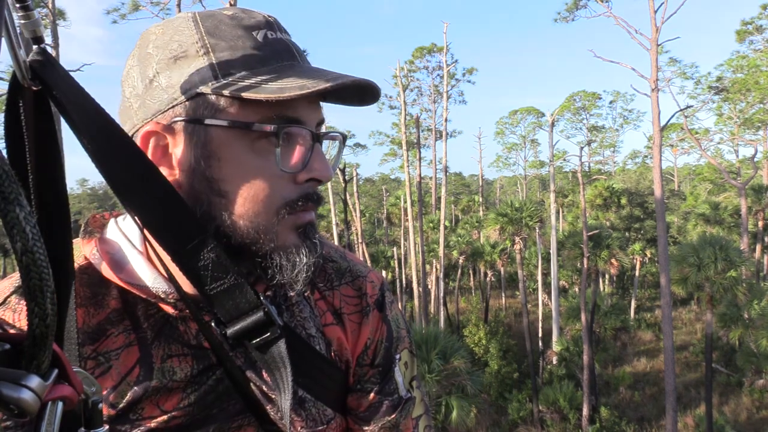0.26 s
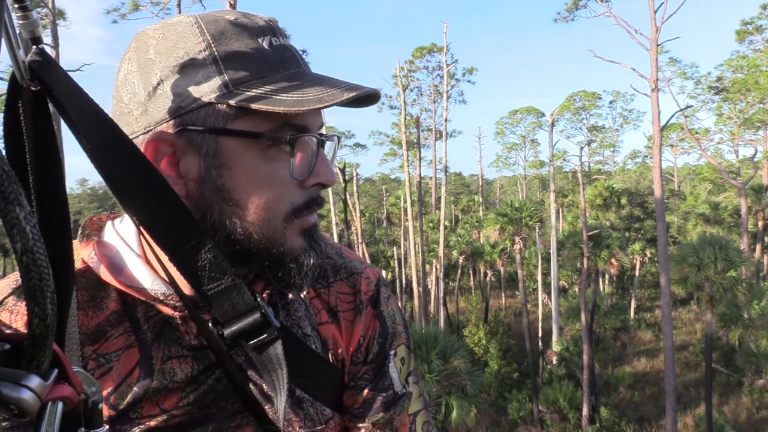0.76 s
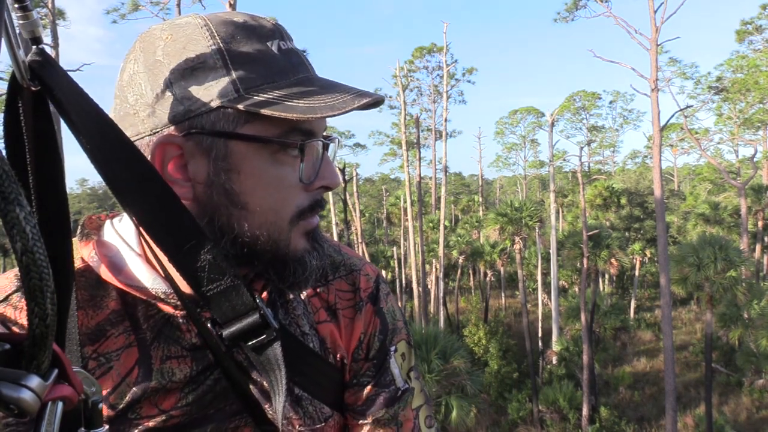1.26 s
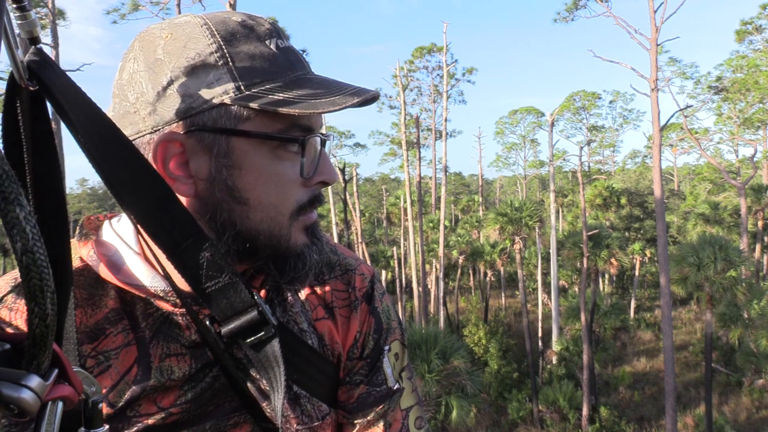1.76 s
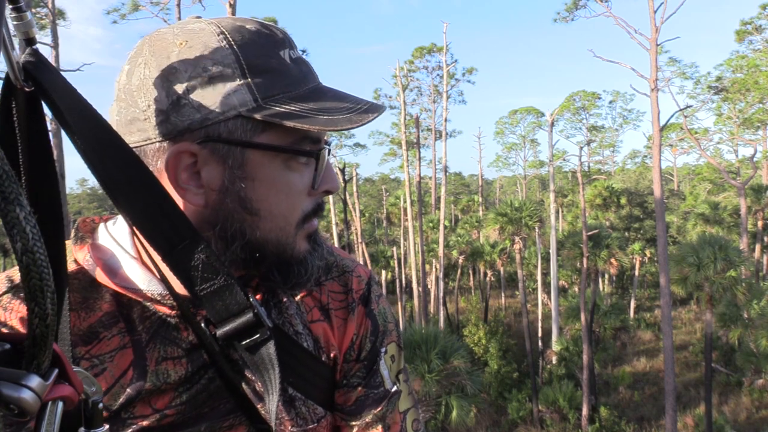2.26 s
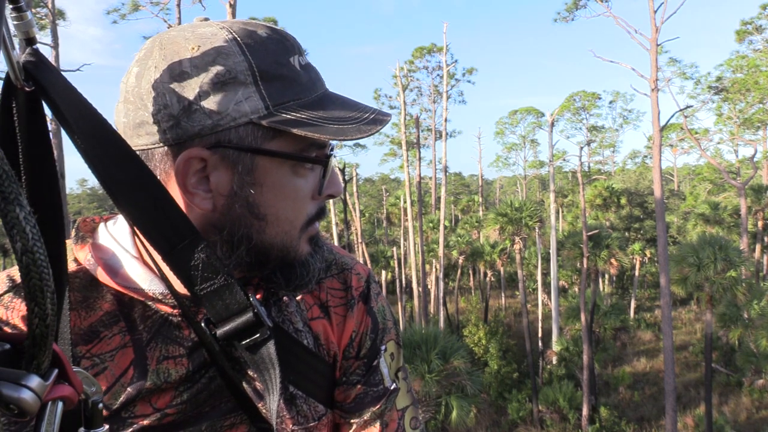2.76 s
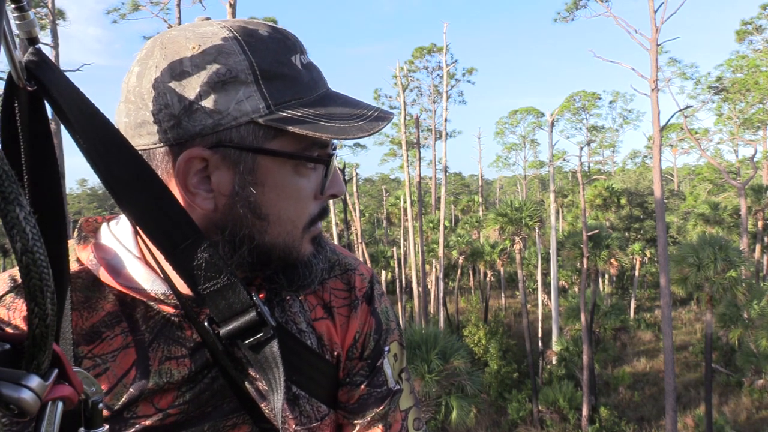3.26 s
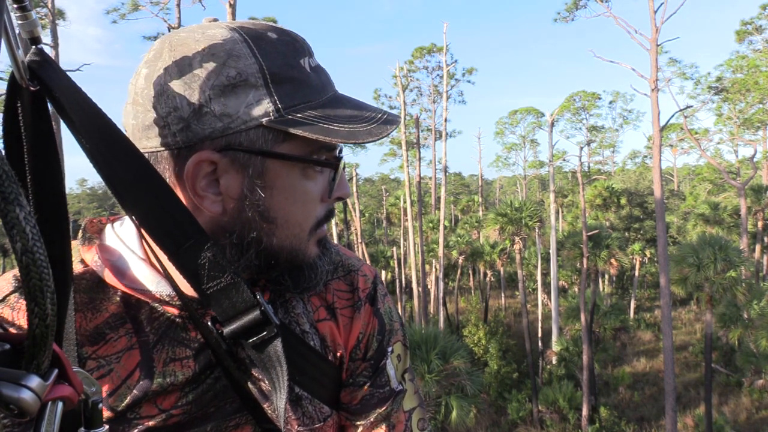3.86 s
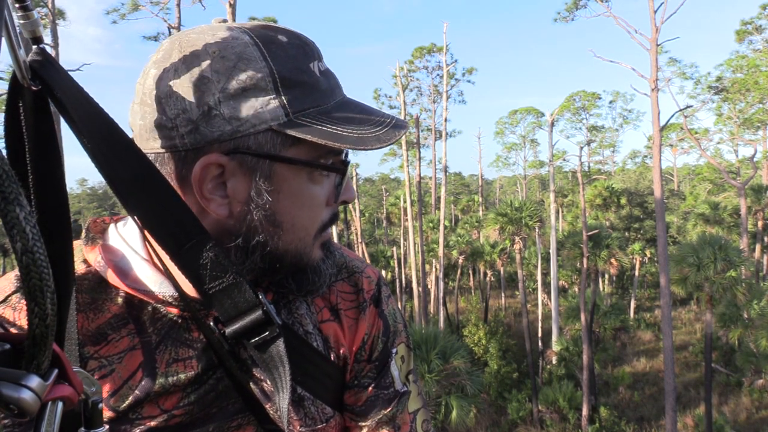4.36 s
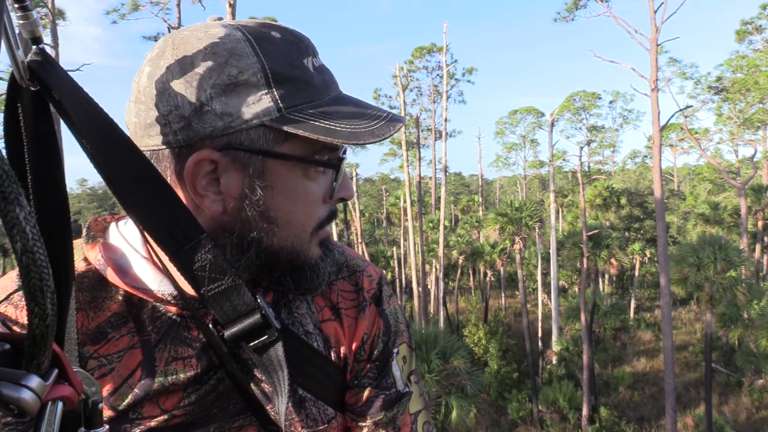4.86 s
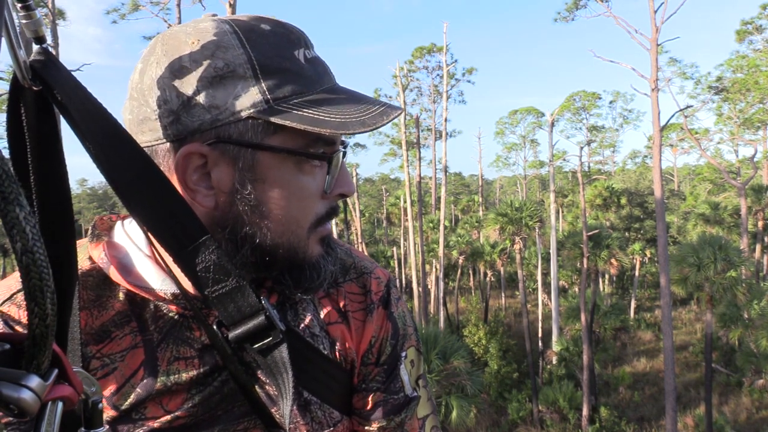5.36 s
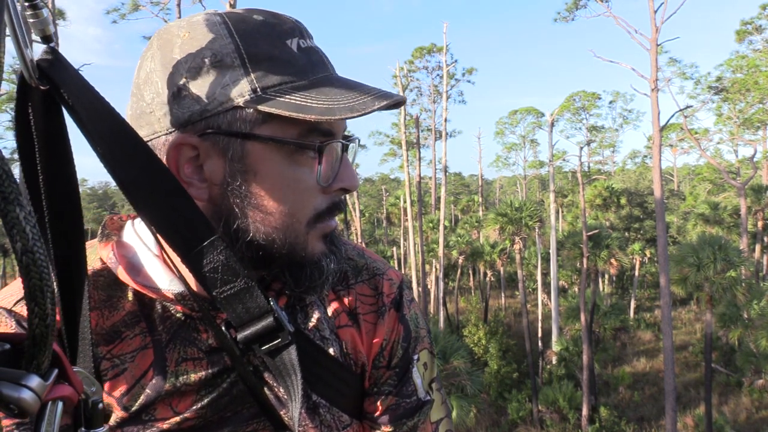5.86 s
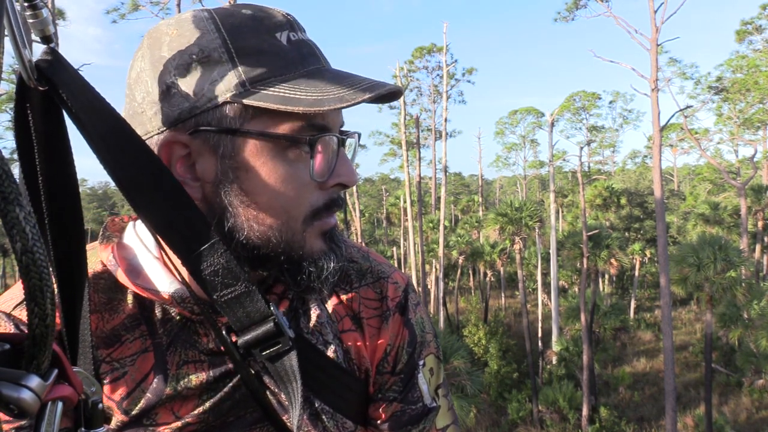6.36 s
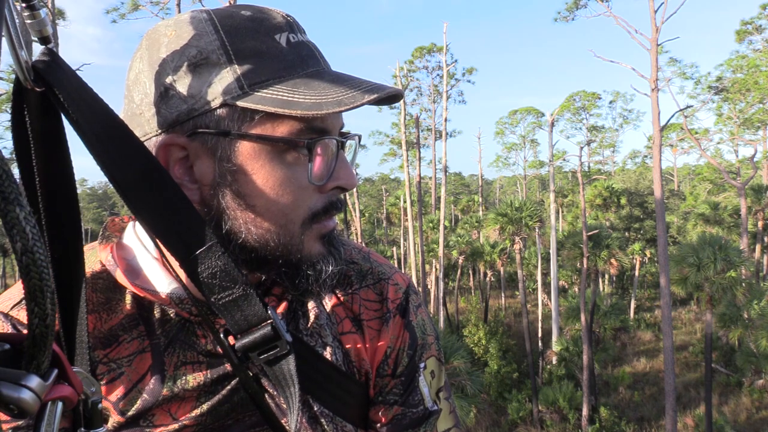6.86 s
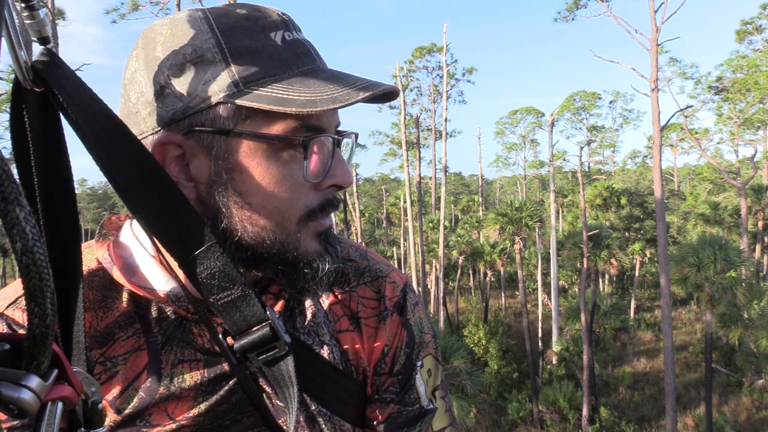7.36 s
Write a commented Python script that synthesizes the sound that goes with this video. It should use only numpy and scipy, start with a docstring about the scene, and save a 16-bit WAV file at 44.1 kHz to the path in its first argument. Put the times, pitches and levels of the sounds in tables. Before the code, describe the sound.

In quiet pine woods a hunter rattles two antlers close to the microphone. Light touches lead to a very loud, slightly overloaded crash, then uneven clacks and gritty grinding for about two seconds. Three shorter bursts follow, separated by pauses where faint insect hiss, a low murmur of air and a few tiny distant bird chips remain. Knocks are dry and bony, with a thin woodland tail.

```python
"""Pine woods throughout: filtered-noise insects and a low distant murmur of air, clearly stronger on the right.
From 0 s two nearby antlers touch lightly (decaying bone modes, short crack), clash at 0.54 s, then clack and
grind (dense tiny slips) to 2.9 s; knocks rebound faintly and the woods return a thin noise-built tail.
Bursts follow at 3.7-4.7, 5.4-6.1 and 7.3-7.6 s; noise chips of a far bird come at 3.0-3.4, 4.1 and 6.8-7.2 s.
The hardest knocks overload the microphone stage."""
import sys
import numpy as np
from scipy import signal
from scipy.fft import rfft, irfft
from scipy.io import wavfile

SR = 44100
rng = np.random.default_rng(int(sys.argv[2]) if len(sys.argv) > 2 else 0)


def wav_out(sig):
    """Save sig, one row per channel (or a flat mono array), as 16-bit PCM at SR to the path in sys.argv[1]."""
    wavfile.write(sys.argv[1], SR, np.round(np.clip(np.atleast_2d(sig).T, -1, 1) * 32767).astype(np.int16))


N = 335601

# air murmur spectrum, relative: freq_hz, density_db
AIR_SPECTRUM = [(20, -1.5), (45, -7.5), (90, -3), (145, 1.5), (220, -6.5), (400, -12.5), (620, -16),
                (735, -8.5), (850, -17), (1500, -24.5), (3000, -24.5), (8000, -32), (11500, -36),
                (13000, -45)]
# insect chorus spectrum, relative: freq_hz, density_db
INSECT_SPECTRUM = [(3500, -31.5), (4700, -23), (5400, -8), (5850, -10), (6300, -0.5), (6600, 1),
                   (6900, -6.5), (7200, -12.5), (7500, -28), (9000, -46)]
# left-right likeness of the background: freq_hz, correlation (unitless)
LIKENESS = [(130, 0.0095), (290, 0.51), (640, 0), (1400, 0), (7000, 0)]
# background balance: freq_hz, left_minus_right_db
SIDE_BALANCE = [(60, -4), (110, -8.5), (200, -14.5), (380, -10), (700, -11), (1290, -12.5), (2380, -6),
                (4400, 0), (8120, -3), (15000, -7)]
# antler knocks: start_s, level_db, favoured_hz (ring favoured by the strike point), edge_db (hard edge, relative)
KNOCKS = [(.0128, -53.5, 1366, -16.5), (0.142, -53.5, 820, -16), (0.1657, -48.5, 2940, -14.5),
          (0.3284, -36.5, 1700, -14.5), (0.4929, -41, 1580, -12), (0.5073, -32.5, 1880, -14.5),
          (.5368, -2.5, 3890, -3), (0.5422, -11, 3050, -12), (.5525, -24.5, 2930, -12.5),
          (0.5639, -5, 2980, -12), (.57, -9, 2965, 1.5), (.579, -16, 1575, -6), (.589, -15.5, 1440, -9),
          (0.6854, -29, 3430, -6.5), (.92, -66.5, 777, -20), (1.1591, -19, 3050, -4),
          (1.1722, -23.5, 2230, -12), (1.1829, -19.5, 2770, -10), (1.188, -25, 2840, -10.5),
          (1.2679, -21.5, 2070, -2), (1.2787, -28, 3730, -6), (1.286, -32.5, 1427, -2.5),
          (1.3608, -25.5, 3290, -8.5), (1.3763, -18, 1224, -17.5), (1.3813, -22, 1068, -3.5),
          (1.4072, -27.5, 1510, -15), (1.425, -22.5, 1604, -3), (1.4486, -43, 1630, -13),
          (1.5295, -51.5, 1040, -33), (1.6461, -22.5, 3560, -9), (1.8353, -25, 2800, -10.5),
          (1.8615, -27.5, 1570, -14.5), (1.8869, -36.5, 2520, -7.5), (1.9872, -13.5, 3160, -20),
          (2.0013, -26, 1440, -6), (2.0056, -11.5, 1594, -9), (2.0171, -23, 1416, -19),
          (2.1037, -29.5, 2980, -15.5), (2.236, -27.5, 3010, -10.5), (2.2999, -26.5, 1425, -16.5),
          (2.3438, -12.5, 1345, -9), (2.3709, -24, 3000, -5), (2.3973, -15, 3620, -3.5),
          (2.403, -26.5, 1350, -27.5), (2.4397, -33, 1370, -11), (2.4614, -37.5, 1545, -17),
          (2.5181, -27, 2860, -11), (2.5869, -31, 1533, -7.5), (2.7028, -45.5, 1214, -29.5),
          (2.874, -65.5, 688, -31), (2.903, -61, 1006, -15), (3.6974, -14, 1378, -13),
          (3.7347, -23.5, 2620, -13), (3.7452, -29.5, 2570, -24), (3.7948, -23.5, 2945, -9.5),
          (3.8259, -35.5, 1380, -13.5), (3.836, -30, 1480, -16), (3.85, -41.5, 1400, -14),
          (4.1784, -27, 3900, 2), (4.21, -42.5, 2830, -5.5), (4.2458, -7, 2740, -6.5),
          (4.254, -10.5, 3550, -5.5), (4.2725, -24, 1347, -6), (4.2818, -16.5, 2870, -5.5),
          (4.288, -24, 2840, -15), (4.3778, -18.5, 3940, -2.5), (4.4059, -29, 3000, -18),
          (4.4147, -29.5, 2890, -11), (4.4325, -25.5, 2530, -7), (4.4675, -17.5, 2770, -8),
          (4.4996, -42, 1540, -15), (4.5468, -17, 3600, 0), (4.5674, -26, 3710, -2),
          (4.6715, -36.5, 1450, -17), (5.3961, -32, 1580, -15.5), (5.409, -39, 1560, -18),
          (5.5069, -51.5, 1573, -45.5), (5.656, -50, 2830, -6.5), (5.73, -55.5, 1290, -25),
          (5.8596, -20, 3900, -2.5), (5.9108, -18.5, 2780, -13), (5.928, -28.5, 2780, -18),
          (6.0272, -43, 1580, -37), (7.306, -54.5, 2590, -22), (7.333, -55, 1494, -2.5),
          (7.3865, -15.5, 3880, -4.5), (7.3997, -32.5, 1450, -33), (7.4195, -39, 1420, -41),
          (7.4683, -15, 3454, -6.5), (7.499, -29, 1476, -12.5), (7.5243, -39, 1460, -22),
          (7.5506, -24, 3720, -9)]
# modes of the antler pair, before grip, strike point and damping: freq_hz, level_db, t60_s
BONE_MODES = [(291.5, -8.5, 0.068), (369, -7, 0.055), (603, -5.5, 0.055), (732.2, -0.5, 0.066),
              (836, -2.5, 0.039), (957.6, -8, 0.032), (1072, -2.5, 0.041), (1250, -3, .04),
              (1381, 3.5, 0.037), (1480, -4.5, 0.031), (1580, -1.5, 0.061), (1780, -7.5, 0.035),
              (2024, 0.5, 0.016), (2100, -4.5, 0.066), (2395, 0.5, 0.017), (2590, -6, 0.025),
              (2800, 3.5, .026), (2901, -0.5, 0.057), (3050, 1, .03), (3325, -3, .024), (3555, 3.5, 0.02),
              (3810, -1, 0.014), (4006, -10.5, 0.034), (4130, -6.5, .02), (5320, -3.5, 0.015),
              (5480, -12, 0.038), (6000, -6, .018)]
# crack and grit spectrum, relative: freq_hz, density_db
CRACK_SPECTRUM = [(40, -16.5), (200, -8), (600, 1), (1400, 6), (3500, 3.5), (5000, -7), (7500, -15.5),
                  (11000, -19), (16000, -34.5)]
# beam ring, main ring and hard edge bands: low_hz, high_hz
BANDS = [(30, 1750), (1750, 4500), (4500, 17000)]
# decay of the woods: freq_hz, t60_s
WOODS_DECAY = [(300, .8), (1000, 1.0), (2500, 1.0), (5000, .62), (10000, .33)]
# colour of the woods' answer, relative: freq_hz, level_db
WOODS_COLOUR = [(200, -2.5), (800, -4.5), (1500, -13), (2600, -11.5), (3600, -17), (5000, -9), (8000, 3),
                (16000, -19)]
# tines sliding on each other; the rows near 560-590 Hz are low woody ring after heavy clashes
# levels before trim: start_s, end_s, start_db, end_db, favoured_hz
SCRAPES = [(0.148, 0.267, -56.5, -64.5, 1200), (0.303, 0.406, -57, -58.5, 2100),
           (0.594, .638, -36.5, -64, 560), (1.032, 1.14, -57, -39, 1180), (1.18, 1.292, -38, -50, 2100),
           (1.274, 1.348, -36, -35, 1900), (1.365, 1.421, -32.5, -39, 1096),
           (1.457, 1.499, -53, -46.5, 1116), (1.562, 1.594, -48.5, -51, 1250),
           (1.77, 1.836, -58.5, -26, 2800), (1.874, 1.898, -45.5, -33.5, 1300),
           (2.008, 2.073, -24.5, -60, 586), (2.124, 2.236, -53.5, -35, 1485),
           (2.482, 2.615, -41.5, -59, 1270), (3.704, 3.837, -37.5, -52.5, 2630),
           (4.305, 4.443, -60, -45, 1480), (4.554, 4.617, -26.5, -45, 1400),
           (4.683, 4.768, -47.5, -69, 747), (5.629, 5.672, -66, -52.5, 1524),
           (5.938, 6.022, -64, -55, 1480), (6.068, 6.138, -57, -55.5, 1517),
           (7.32, 7.384, -51.5, -63.5, 1530), (7.384, 7.462, -36, -52, 1430),
           (7.479, 7.537, -65, -64, 1610)]
# far bird chips, before distance loss: start_s, level_db
CHIPS = [(2.98, -74), (3.15, -70), (3.37, -68.5), (4.071, -70.5), (6.80, -75), (7.01, -75), (7.21, -77)]

EDGE_HZ = 16300  # upper band limit
FAVOUR_DB = 11  # lift of the mode at the contact point
# ordinary knock: reference for the rules below
USUAL_DB, USUAL_HZ = -30, 2000
# light, soft or thick-end contacts leave more of the sound in the low beam ring
BEAM_DB, BEAM_DB_PER_DB, BEAM_DB_PER_OCTAVE = -10, -0.0929, -6.5
SOFT_EDGE_DB, BEAM_DB_PER_SOFT_DB = -17.5, 0.4972
# strikes near the tips die sooner: length factor, exponent over favoured pitch
RING_LENGTH, RING_SLOPE = 0.96, -.35
# left minus right: grows with force, most above CLASH_DB
PAN_DB, PAN_DB_PER_DB, CLASH_DB, CLASH_PAN_DB_PER_DB = 1.74, 0.1394, -18, 0.78
# tines fall back together, each time later and weaker; mostly the beams ring
REBOUND_S, REBOUND_SPREAD = 0.015, 0.27  # median gap, log spread of gaps
REBOUND_DB, REBOUND_DB_PER_DB, REBOUND_STEP_DB, REBOUND_DB_PER_OCTAVE = -21, -0.06, -13, -7.5
REBOUND_HZ, REBOUND_OCTAVES, REBOUND_EDGE_DB = 1300, 0.37, -17


def gain_of(db):
    """Decibels to amplitude."""
    return 10 ** (np.asarray(db) / 20)


def evened(x):
    """Each channel at rms 1."""
    return x / np.sqrt(np.mean(x ** 2, -1, keepdims=True) + 1e-20)


def read(points, hz):
    """Table value at hz, on a log-frequency axis."""
    f, value = np.transpose(points)
    return np.interp(np.log(hz + 1), np.log(f), value)


def add(mix, start_s, sound):
    """Lays a stereo sound into the mix at start_s."""
    part = mix[:, max(round(start_s * SR), 0):][:, :sound.shape[1]]
    part += sound[:, :part.shape[1]]


def noise(spectrum, size, likeness):
    """Stereo noise of given colour and left-right likeness, rms 1."""
    a, b = rfft(rng.standard_normal((2, size)))
    likeness = np.clip(likeness, -1, 1)
    pair = np.array([a, likeness * a + np.sqrt(1 - likeness ** 2) * b])
    colour = gain_of(read(spectrum, np.fft.rfftfreq(size, 1 / SR)))
    return evened(irfft(pair * colour, size))


def background(air_db=-65, insects_db=-70.5, shimmer_db=1):
    """Distant air and a steady chorus of insects whose level shimmers slightly: shaped noise, tilted by side."""
    hz = np.fft.rfftfreq(N, 1 / SR)
    likeness = read(LIKENESS, hz)
    shimmer = noise([(2, 0), (25, -6), (80, -60), (200, -120)], N, .5)
    air = noise(AIR_SPECTRUM, N, likeness) * gain_of(air_db)
    insects = noise(INSECT_SPECTRUM, N, likeness) * gain_of(insects_db + shimmer_db * shimmer)
    side_gain = gain_of(np.outer([.5, -.5], read(SIDE_BALANCE, hz)))
    return irfft(rfft(air + insects) * side_gain, N)


def ring(t, favoured_hz, length, favour_width=0.098, spread_db=3.5, grip=.035, apart_rad=0.36,
         lead_s=.00008, travel_s=0.0011):
    """Bone modes after one touch; strike point and grip change their shares and pitch."""
    hz, db, t60_s = np.transpose(BONE_MODES)
    share, detune, left, right = rng.standard_normal((4, len(hz)))
    hz = hz * (1 + grip * detune)
    hz[np.argmin(abs(hz - favoured_hz))] = favoured_hz  # contact pulls the nearest mode to its pitch
    near = np.exp(-(np.log(hz / favoured_hz) / favour_width) ** 2)
    db = db + spread_db * share * (1 - near) + FAVOUR_DB * near
    t60_s = np.minimum(t60_s, 80 / hz) * length  # the bone's own loss: 80 cycles at most, before the length factor
    polarity = rng.choice([-1, 1], (len(hz), 1))
    decays = polarity * gain_of(db[:, None] - 60 * t / t60_s[:, None])
    # low bending waves travel slowly along the beam: low modes build up later; travel_s applies at 1 kHz
    decays = decays * (1 - np.exp(-t / travel_s * (hz[:, None] / 1000) ** 2))
    # right leads; each mode radiates a little differently to the two sides
    phase = np.array([apart_rad * left, apart_rad * right + 2 * np.pi * hz * lead_s])
    waves = np.sin(2 * np.pi * hz[:, None] * t + phase[..., None])
    return evened((decays * waves).sum(1))


def nearby(x, echo=0.24, latest_s=.005, count=5):
    """Hands, chest and trunk throw back a few early reflections."""
    out = x.copy()
    for delay_s, size in zip(rng.uniform(.001, latest_s, count), rng.standard_normal(count)):
        add(out, delay_s, echo * size * x)
    return out


def dulled(x, corner_hz):
    """A softer, longer contact leaves out the highest frequencies: second-order low-pass."""
    sos = signal.butter(2, np.clip(corner_hz, 800, 18000), fs=SR, output="sos")
    return signal.sosfilt(sos, x)


def knock(level_db, beam_db, edge_db, favoured_hz, length, pan_db, crack_db=-4, crack_t60_s=0.012,
          rise_s=0.0006, shade_db=3, beam_pan=0.59, beam_side_db=-1, corner_hz=12000, db_per_octave=45):
    """One blow: ringing modes and a short crack, weighted by how heavy and how hard the contact is."""
    t = np.arange(SR // 8) / SR
    length = max(length, .3)
    crack = evened(noise(CRACK_SPECTRUM, len(t), 1.0) * gain_of(-60 * t / (crack_t60_s * length)))
    contact = ring(t, favoured_hz, length) + gain_of(crack_db) * crack
    blow = nearby(contact * (1 - np.exp(-t / rise_s)))
    blow = dulled(blow, corner_hz * 2 ** ((level_db + edge_db) / db_per_octave))  # light touches are duller
    # per band: level, left minus right; the hard edge leans further left than the main ring
    shares = [(beam_db, beam_pan * pan_db + beam_side_db), (0, pan_db), (edge_db, pan_db + shade_db)]
    out = 0
    for band, (db, side_db) in zip(BANDS, shares):
        part = signal.sosfilt(signal.butter(3, band, "band", fs=SR, output="sos"), blow)
        out = out + evened(part) * gain_of([[db], [db - side_db]])
    # level_db: left main-ring energy spread over 10 ms
    return out * gain_of(level_db) * np.sqrt(.01 * SR / len(t))


def strike(level_db, favoured_hz, edge_db):
    """Force, strike point and softness of contact set a knock's low ring, length and side."""
    force_db, octaves = level_db - USUAL_DB, np.log2(favoured_hz / USUAL_HZ)
    beam_db = BEAM_DB + BEAM_DB_PER_DB * force_db + BEAM_DB_PER_OCTAVE * octaves
    beam_db += BEAM_DB_PER_SOFT_DB * max(SOFT_EDGE_DB - edge_db, 0)
    pan_db = PAN_DB + PAN_DB_PER_DB * force_db + CLASH_PAN_DB_PER_DB * max(level_db - CLASH_DB, 0)
    length = RING_LENGTH * 2 ** (RING_SLOPE * octaves)
    return knock(level_db, beam_db, edge_db, favoured_hz, length, pan_db)


def woods(x, wet_db=-29, build_s=0.004, turn_s=0.0057, count=4):
    """Trunks and fronds scatter a thin, long tail; several noise tails cross-fade in turn, so it is diffuse."""
    turns, out = np.arange(N) / SR / turn_s, 0
    for k in range(count):
        hz, t, z = signal.stft(rng.standard_normal((2, SR)), SR, nperseg=256)
        decay_db = -60 * t / read(WOODS_DECAY, hz)[:, None]
        z = z * gain_of(read(WOODS_COLOUR, hz)[:, None] + decay_db) * (1 - np.exp(-t / build_s))
        tail = signal.istft(z, SR, nperseg=256)[1]
        tail = tail / np.linalg.norm(tail[0])
        fade = np.sin(np.pi / 2 * np.minimum((turns - k) % count, 2))
        out = out + signal.fftconvolve(x * fade, tail, axes=1)[:, :N]
    return gain_of(wet_db) * out


def rebounds(count=2):
    """Faint uneven taps after each knock, on changing spots; hard knocks and tips spring clear and rebound less."""
    out = np.zeros((2, N))
    draws = rng.standard_normal((len(KNOCKS), 2, count))
    for (start_s, level_db, hz, _), (late, spot) in zip(KNOCKS, draws):
        first_db = level_db + REBOUND_DB + REBOUND_DB_PER_DB * (level_db - USUAL_DB)
        first_db += REBOUND_DB_PER_OCTAVE * max(np.log2(hz / USUAL_HZ), 0)
        delays_s = np.cumsum(REBOUND_S * np.exp(REBOUND_SPREAD * late))
        for k, delay_s in enumerate(delays_s):
            tap_hz = REBOUND_HZ * 2 ** (REBOUND_OCTAVES * spot[k])
            add(out, start_s + delay_s, strike(first_db + k * REBOUND_STEP_DB, tap_hz, REBOUND_EDGE_DB))
    return out


def scrape(seconds, start_db, end_db, favoured_hz, uneven_db=2.5, grit_db=-7, corner_hz=5800,
           corner_slope=.9, fade_s=.007, trim_db=1, right_db=-2, count=4):
    """Ridges catch and slip: dense tiny blows, as contact hops between points that each have their own ring."""
    slips_per_s, hold_s, catch_db, wander, ring_width = 1100, .009, 2.3, .1, .15  # hold_s: mean
    size, t = max(round(seconds * SR), 64), np.arange(SR // 16) / SR
    slips = rng.random(size) < slips_per_s / SR
    slips = slips * gain_of(uneven_db * np.minimum(rng.exponential(1, size), 3))
    pressure = gain_of(np.linspace(start_db, end_db, size)) * signal.windows.tukey(size, 2 * fade_s / seconds)
    hop = np.cumsum(rng.random(size) < 1 / (hold_s * SR))
    catch = gain_of(catch_db * rng.standard_normal(size + 1)[hop])
    slips = slips * rng.choice([-1, 1], size) * pressure * catch
    rub = 0
    for k in range(count):
        grit = evened(noise(CRACK_SPECTRUM, len(t), 0.92) * gain_of(-60 * t / 0.0078))
        point_hz = favoured_hz * (1 + wander * rng.uniform(-1.2, 1))
        touch = ring(t, point_hz, 0.49, ring_width) + gain_of(grit_db) * grit
        rub = rub + signal.fftconvolve((slips * (hop % count == k))[None], touch, axes=1)
    rub = dulled(rub, corner_hz * (favoured_hz / USUAL_HZ) ** corner_slope)  # duller near the thick end
    rub = evened(rub) * np.sqrt(np.sum(pressure ** 2) / rub.shape[1])  # energy follows pressure
    return rub * gain_of([[trim_db], [trim_db + right_db]])


def antlers():
    """All knocks, scrapes, low woody rings and rebounds: bone modes excited by single or dense blows."""
    out = np.zeros((2, N))
    for start_s, *blow in KNOCKS:
        add(out, start_s, strike(*blow))
    for start_s, end_s, *stroke in SCRAPES:
        add(out, start_s, scrape(end_s - start_s, *stroke))
    return out + rebounds()


def bird(centre_hz=4700, width_hz=450, distance_db=2, seconds=0.075):
    """Short high chips, blurred by distance: band-shaped noise under a smooth swell."""
    size = round(seconds * SR)
    colour = [(centre_hz - 2 * width_hz, -40), (centre_hz - width_hz / 2, -3),
              (centre_hz + width_hz / 2, 0), (centre_hz + 2 * width_hz, -50)]
    out = np.zeros((2, N))
    for start_s, level_db in CHIPS:
        chip = noise(colour, size, 0.17) * signal.windows.hann(size)
        add(out, start_s, gain_of(level_db - distance_db) * chip)
    return out


def scene():
    """Antlers close by, the woods around them."""
    near = antlers()
    return near + woods(near) + bird() + background()


def record(dry, ceiling=.335, bias=0.027):
    """Microphone stage flattens the hardest knocks lopsidedly, adding a low thump; then the band limit."""
    fine = signal.resample_poly(dry, 2, 1, axis=1) + bias
    fine = fine / (1 + (fine / ceiling) ** 8) ** (1 / 8) - bias
    clipped = signal.resample_poly(fine, 1, 2, axis=1)
    band_limit = signal.firwin(255, EDGE_HZ, window=("kaiser", 9), fs=SR)
    return signal.oaconvolve(clipped, band_limit[None], "same")


dry = scene()
out = record(dry)
wav_out(out)
```